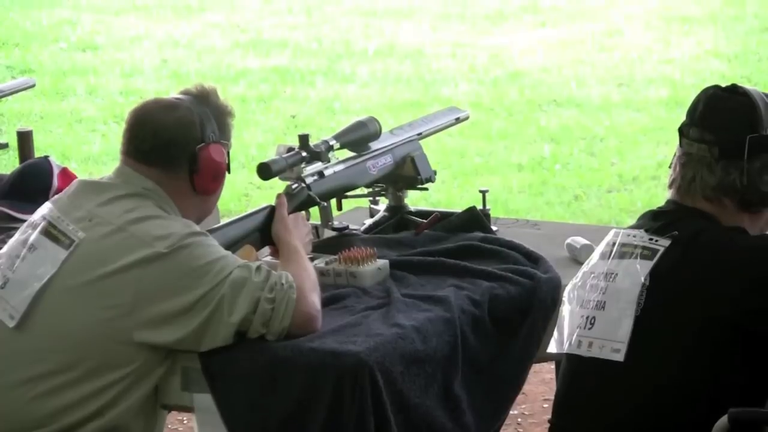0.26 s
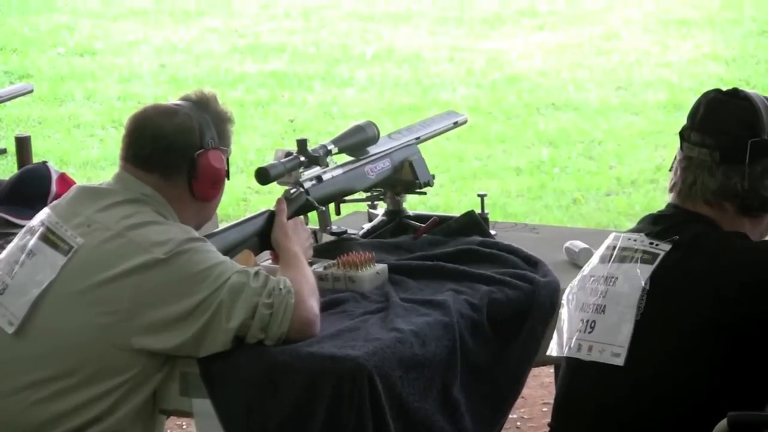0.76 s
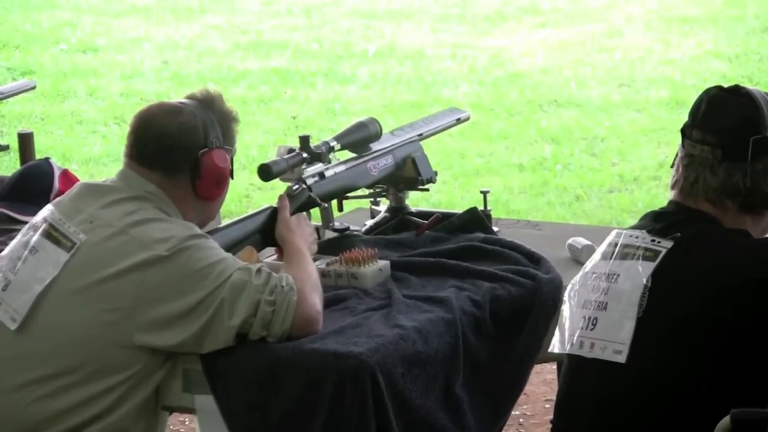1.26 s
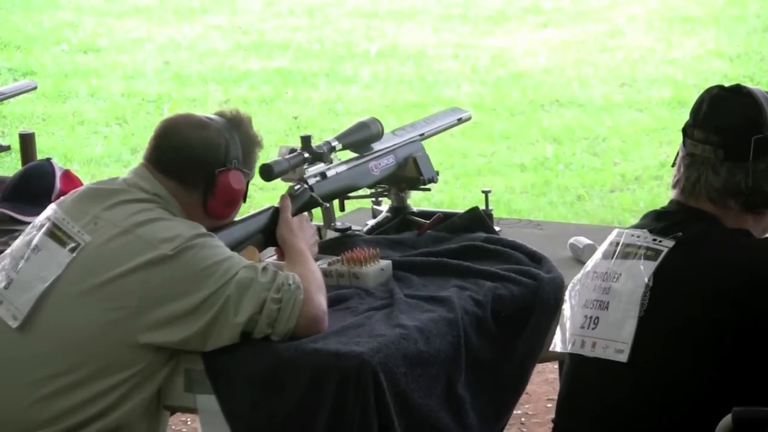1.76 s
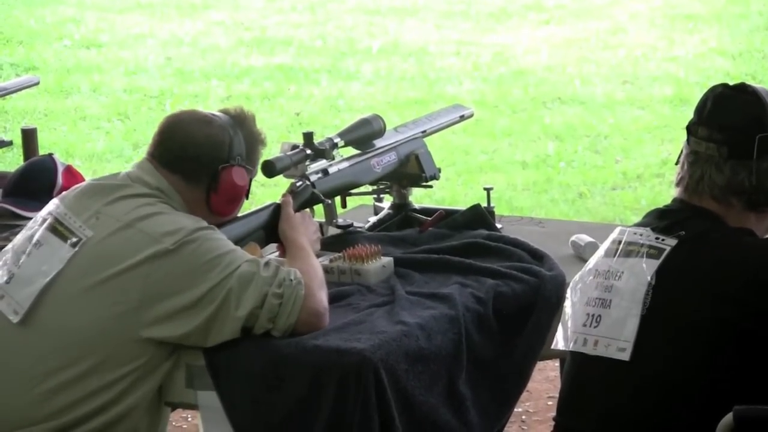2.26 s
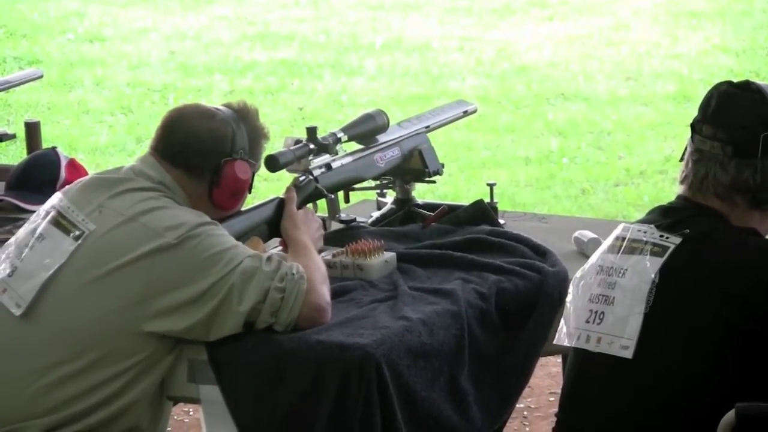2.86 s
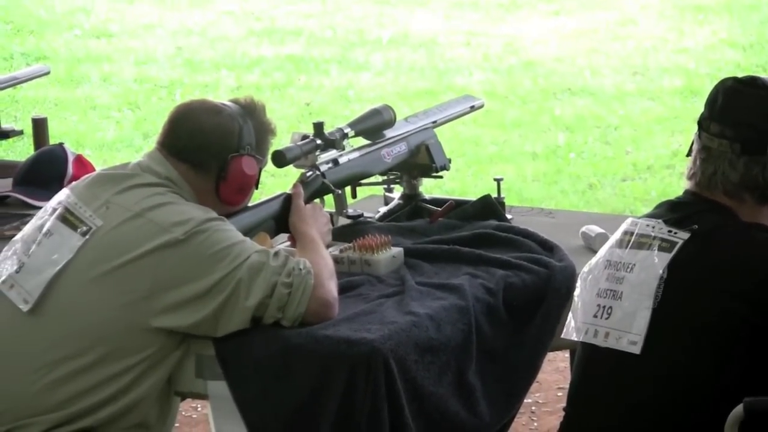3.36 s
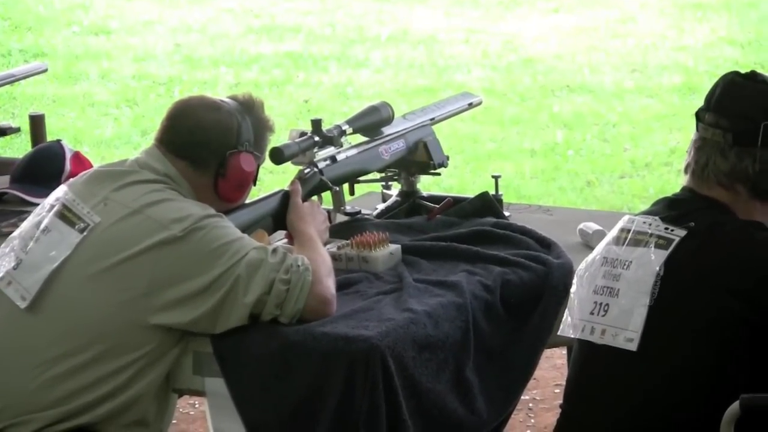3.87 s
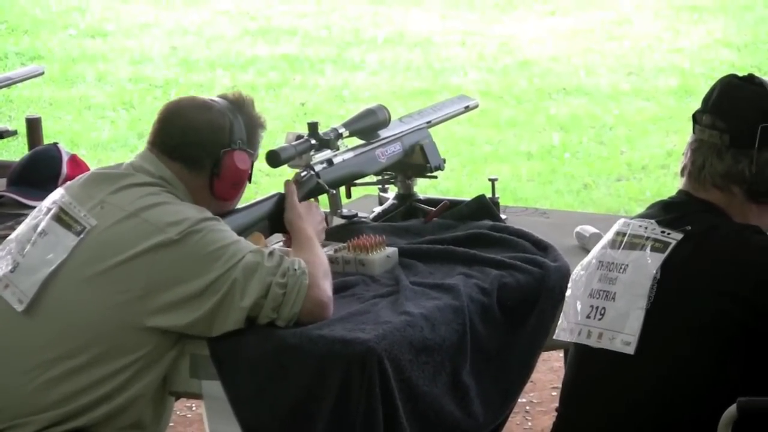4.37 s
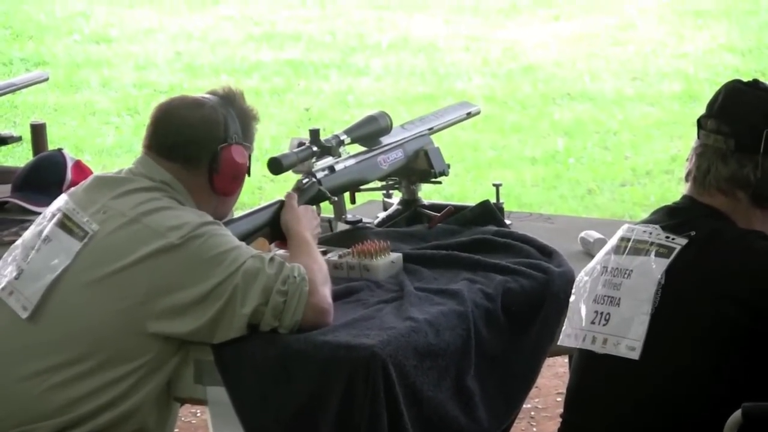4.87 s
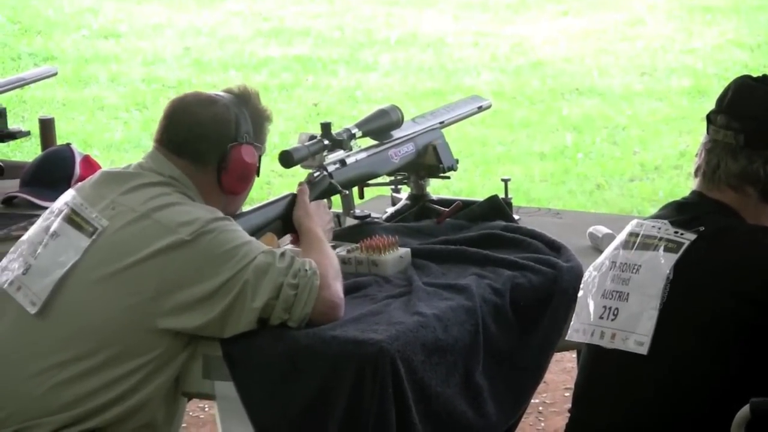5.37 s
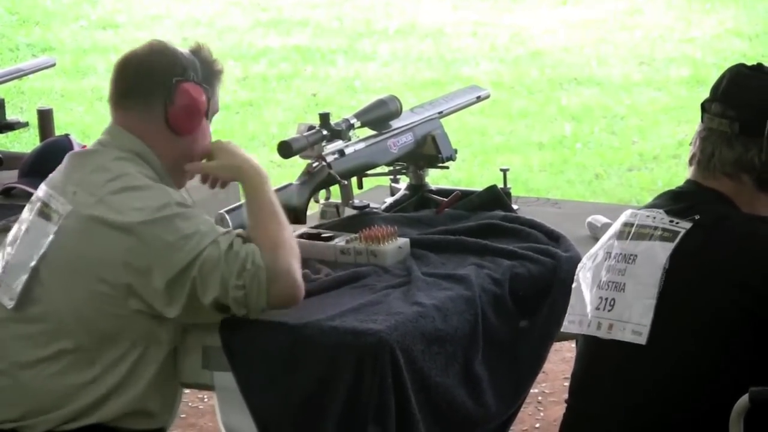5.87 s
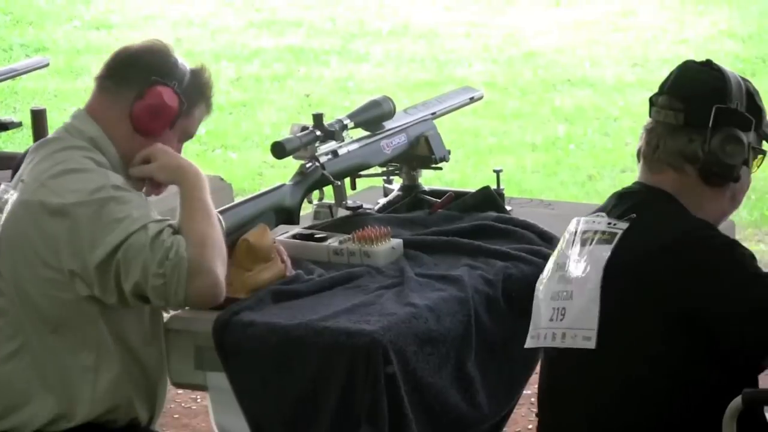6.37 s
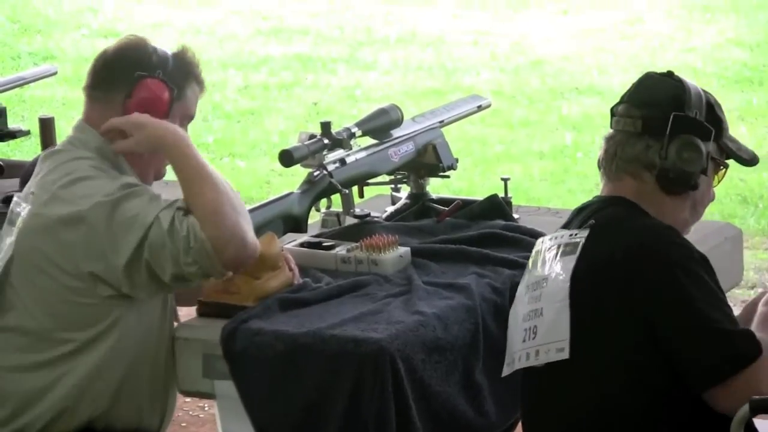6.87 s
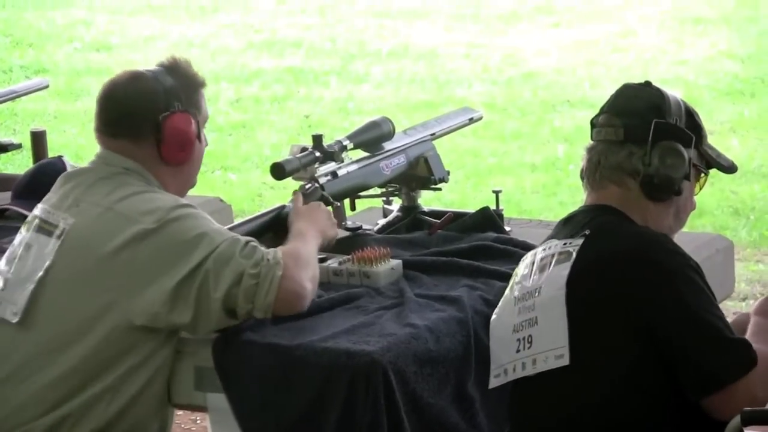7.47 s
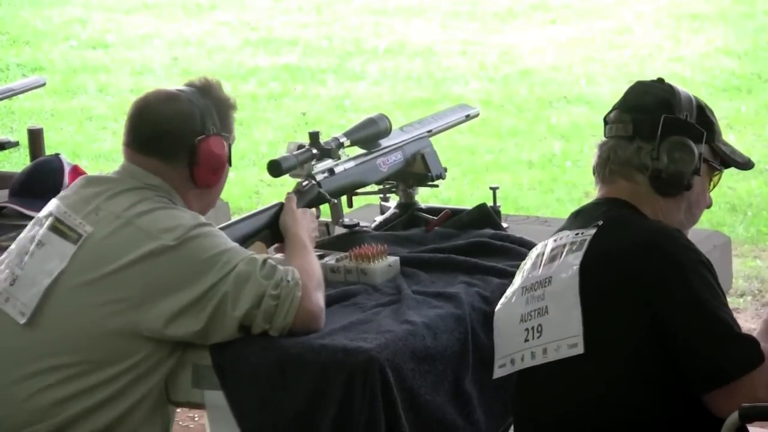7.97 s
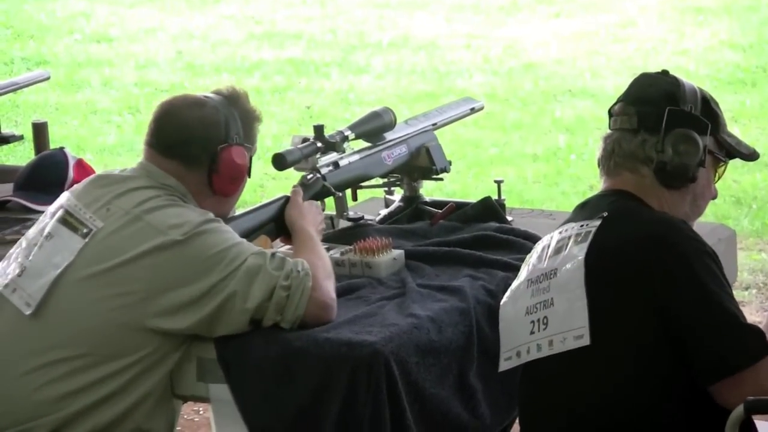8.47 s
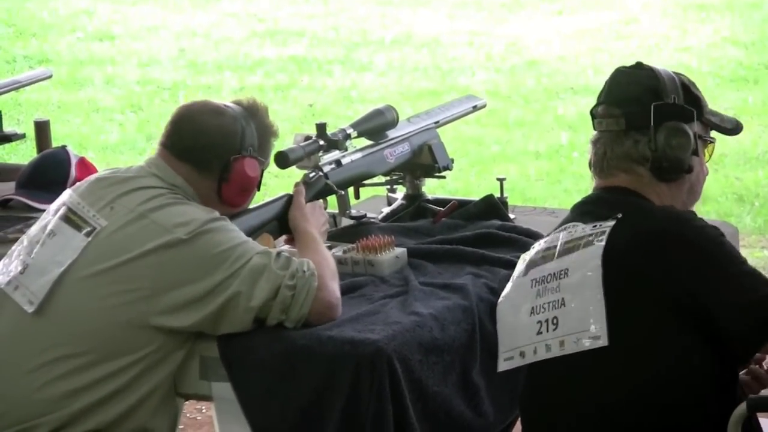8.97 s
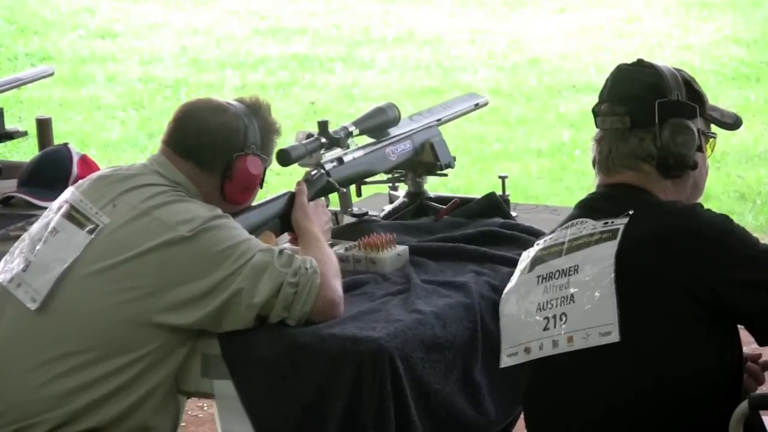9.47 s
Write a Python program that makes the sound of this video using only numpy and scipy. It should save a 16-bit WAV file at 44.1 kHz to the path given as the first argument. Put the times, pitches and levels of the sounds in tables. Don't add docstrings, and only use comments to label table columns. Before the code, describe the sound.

Small-bore or bench rifles fire from a roofed outdoor line. Each blast is a hard, distorted crack with a slap and ring under the roof, then a rolling echo from a far bank. Shots come singly, then in quick clusters midway. Steel bolt clicks and faint brassy rustles fill the gaps. The microphone's automatic gain ducks at each blast, then climbs back, lifting echoes, soft air and low hum.

```python
import sys
import numpy as np
from scipy import signal
from scipy.io import wavfile
from scipy.ndimage import uniform_filter1d, minimum_filter1d

SR = 44100
rng = np.random.default_rng(int(sys.argv[2]) if len(sys.argv) > 2 else 0)


def natural_amplitude(level_db):
    exponent = np.asarray(level_db, float) / 20
    return 10 ** exponent


def to_wav(sig):
    pcm = np.clip(np.atleast_2d(sig), -1, 1) * 32767
    pcm = np.round(pcm).astype(np.int16)
    wavfile.write(sys.argv[1], SR, pcm.T)


N = 429093
HOP = 128
BINS = np.fft.rfftfreq(4 * HOP, 1 / SR)


def evened(x):
    return x / np.sqrt(np.mean(x ** 2) + 1e-20)


def read(points, hz):
    point_hz, value = np.transpose(points)
    return np.interp(np.log(hz + 1), np.log(point_hz + 1), value)


def unit(spectrum, hz):
    gain = natural_amplitude(read(spectrum, hz))
    return gain / np.linalg.norm(gain)


def add(mix, start_s, sound):
    at = round(start_s * SR)
    sound = sound[..., max(-at, 0):]
    part = mix[..., max(at, 0):][..., :sound.shape[-1]]
    part += sound[..., :part.shape[-1]]


def resonate(x, hz, width_hz):
    pole = np.exp((2j * np.pi * hz - np.pi * width_hz) / SR)
    return 2 * signal.lfilter([1 - abs(pole)], [1, -pole], x).real


def twice(x, hz, width_hz, second_width_hz):
    return resonate(resonate(x, hz, width_hz), hz, second_width_hz)


def pan(db):
    return natural_amplitude(np.array([[db / 2], [-db / 2]]))


# pitch_hz, likeness (left-right, 1 = same)
LIKENESS = [(30, -.3), (60, .4), (130, .9), (290, .96), (640, .95), (1400, .94), (3100, .8), (6800, .45),
            (15000, .02)]
# pitch_hz, left_over_right_db
BALANCE = [(60, -2.0), (180, -2.0), (550, -2.0), (1650, -1.5), (4970, -1.5), (15000, -1.5)]


def noise(gain, patchy_db):
    a, b, c, d, patches = np.moveaxis(rng.standard_normal(gain.shape + (5,)), 2, 0)
    patches = uniform_filter1d(patches, size=8, axis=0)
    patches = evened(uniform_filter1d(patches, size=12, axis=1))
    same = np.clip(read(LIKENESS, BINS), -1, 1)
    lean = natural_amplitude(read(BALANCE, BINS) / 2)
    left = a + 1j * b
    right = same * left + np.sqrt(1 - same ** 2) * (c + 1j * d)
    z = np.array([left * lean, right / lean]) * gain * natural_amplitude(patchy_db * patches)
    return signal.istft(z.transpose(0, 2, 1), nperseg=4 * HOP, noverlap=3 * HOP)[1] / 1.5


# pitch_hz, level_db (rms)
HUM_TONES = [
    (199.6, -50.5),
    (399.2, -70),
    (598.8, -70),
]
# pitch_hz, level_db (per Hz)
AIR_SPECTRUM = [(30, -20), (100, -8), (350, -3), (600, -2), (2000, -14), (5000, -23), (14000, -33),
                (16000, -40)]


def background():
    t = np.arange(N) / SR
    waver = natural_amplitude(1.5 * evened(resonate(rng.standard_normal(N), 3, 6)))
    hum = np.zeros(N)
    for hz, db in HUM_TONES:
        hum += np.sqrt(2) * natural_amplitude(db) * np.sin(2 * np.pi * (hz * t + rng.random()))
    frames = N // HOP + 10
    air = noise(np.tile(unit(AIR_SPECTRUM, BINS), (frames, 1)), patchy_db=1.5)[:, :N]
    return waver * hum * pan(-1.5) + natural_amplitude(-44) * air


# start_s, level_db, pitch_hz, t60_s
KNOCKS = [
    (9.6, -33, 220, .3),
    (.95, -44, 260, .2),
]


def bench_knocks():
    out = np.zeros((2, N))
    t = np.arange(SR // 2) / SR
    for start_s, db, hz, t60_s in KNOCKS:
        wood = evened(twice(rng.standard_normal(len(t)), hz, 250, 400))
        add(out, start_s, natural_amplitude(db - 60 * t / t60_s) * wood)
    return out


# start_s, end_s, pitch_hz, width_hz, level_db
BOLT_SQUEALS = [
    (2.28, 2.4, 7000, 150, -48),
    (8.27, 8.47, 7500, 120, -49),
    (8.26, 8.5, 13200, 60, -62),
    (8.49, 8.67, 13250, 90, -50),
    (3.3, 3.42, 13100, 80, -66),
]
# start_s, end_s, pitch_hz, width_hz, level_db
BRASS_RUSTLES = [
    (2.39, 2.51, 10000, 6000, -47),
    (7.925, 8.06, 11800, 3000, -59),
    (8.3, 8.5, 9000, 5000, -58),
    (8.5, 8.66, 7000, 7000, -43),
    (3.55, 4.14, 11000, 5000, -62),
]


def rubbing():
    out = np.zeros((2, N))
    for start_s, end_s, hz, width_hz, db in BOLT_SQUEALS + BRASS_RUSTLES:
        rub = rng.standard_normal((2, SR))[:, :round((end_s - start_s) * SR)]
        swell = signal.windows.tukey(rub.shape[1], .3)
        add(out, start_s, natural_amplitude(db) * evened(twice(rub, hz, width_hz, width_hz * 2)) * swell)
    return out


def tick(db, hz, top_db):
    t60_s = .014
    t = np.arange(SR // 10) / SR
    burst = rng.standard_normal((2, len(t))) * natural_amplitude(-60 * t / t60_s)
    crack = twice(burst, 6000, 3500, 3500)
    ring = 3.0 * twice(burst, hz, 700, 700)
    body = 2.6 * resonate(burst[0], 2000, 1800)
    dull = signal.butter(4, 7400, fs=SR, output="sos")
    top = natural_amplitude(min(top_db, -12) + .3) * twice(burst, 12000, 4000, 4000)
    return natural_amplitude(db + 1.6) * pan(-1.5) * (signal.sosfilt(dull, crack + ring + body) + top)


# start_s, level_db (peak after gain control), pitch_hz, top_db
CLICKS = [(0.0992, -36, 4350, -12), (0.831, -18, 4530, -32), (0.8565, -24, 5220, -33),
          (1.0794, -31, 4170, -22), (1.7504, -22, 4760, -24), (2.0333, -26, 4350, -37),
          (2.0827, -31, 4520, -33), (2.3945, -21, 5020, -15), (3.0505, -17, 4190, -20),
          (3.1363, -23, 4310, -30), (3.2869, -21, 4320, -40), (3.3288, -21, 5130, -41),
          (3.6032, -29, 4210, -34), (3.6461, -30, 4010, -36), (3.7125, -34, 4050, -31),
          (3.7509, -32, 4490, -31), (3.8641, -34, 4120, -25), (5.3492, -19, 5490, -25),
          (5.4445, -22, 5540, -30), (6.2257, -22, 5030, -25), (6.3425, -23, 4540, -32),
          (7.4205, -25, 5290, -25), (7.6395, -32, 4200, -32), (7.9274, -35, 4260, -18),
          (8.5036, -28, 8370, -18), (9.1835, -8, 4430, -33), (9.2609, -20, 4210, -31),
          (9.3242, -24, 4770, -30), (9.6879, -29, 4010, -40)]


def bolts_and_cases():
    out = np.zeros((2, N))
    for start_s, *click in CLICKS:
        add(out, start_s, tick(*click))
    return out


def muzzle(count):
    t = np.arange(count) / SR
    taps = rng.standard_normal((2, count)) * (rng.random(count) < .012) * natural_amplitude(-500 * t)
    taps[:, 0] = 1
    u = t / .0002
    return natural_amplitude(8.0) * signal.fftconvolve(taps, ((1 - u) * np.exp(-u))[None])


def ground_thud(count, lead_s):
    t = np.arange(count) / SR
    ahead = t[t < lead_s]
    thud = evened(resonate(rng.standard_normal(count), 1100, 1200))[:len(ahead)]
    return natural_amplitude(-51) * thud * ahead / lead_s


# pitch_hz, level_db (per Hz)
ROOF_SPECTRUM = [(25, -32), (114, -21), (200, -4), (280, -1), (363, -.5), (620, -6), (1020, -8), (1840, -9),
                 (2480, -12), (4030, -19), (6380, -21), (14400, -31), (16000, -40)]
# pitch_hz, t60_s
ROOF_DECAY = [(60, .9), (250, .85), (700, .78), (2000, .8), (6000, .7), (14000, .55)]


def roof_ring(age_s, ring_db):
    ring = unit(ROOF_SPECTRUM, BINS) * natural_amplitude(-60 * age_s / read(ROOF_DECAY, BINS))
    slap = natural_amplitude(-60 * age_s / .15)
    return ring * (natural_amplitude(ring_db) + (1 - natural_amplitude(ring_db)) * slap)


# pitch_hz, level_db (per Hz)
FAR_SPECTRUM = [(25, -41), (64, -17), (166, -9), (293, -17), (489, -8), (659, -6), (863, -2), (1370, -3),
                (1740, -2), (2220, -4), (3160, -6), (5570, -15), (11300, -33), (16000, -60)]
# pitch_hz, loss_db_per_s
FAR_FADING = [(40, 12), (100, 12), (200, 20), (400, 21), (800, 5), (1500, .1), (3000, 1), (6000, 8),
              (12000, 28)]
# age_s (since the blast), level_db
ECHO_ROLL = [(0, -26), (.1, -17.5), (.3, -18.5), (.55, -23.5), (.7, -32), (1.0, -42.5), (1.3, -51),
             (1.8, -66), (2.6, -88)]


def far_echo(age_s, far_db):
    roll_db = np.interp(age_s, *np.transpose(ECHO_ROLL))
    return unit(FAR_SPECTRUM, BINS) * natural_amplitude(far_db + roll_db - (age_s - .5) * read(FAR_FADING, BINS))


def shot(db, bright_db, far_db, ring_db, count, lead_s):
    age_s = np.arange(count)[:, None] * HOP / SR
    bright = natural_amplitude(bright_db * np.log2(BINS / 1500 + .05))
    tails = noise(np.hypot(roof_ring(age_s, ring_db), far_echo(age_s, far_db)) * bright, patchy_db=1.3)
    t = np.arange(tails.shape[1]) / SR
    drum = evened(twice(rng.standard_normal(tails.shape), 75, 22, 22))
    tails = tails + drum * natural_amplitude(-33 + np.interp(t, *np.transpose(ECHO_ROLL)))
    tails = tails * (1 - np.exp(-t / .001))
    add(tails, 0, muzzle(1200))
    thud = ground_thud(1200, lead_s)
    return natural_amplitude(db) * np.hstack([[thud, thud], tails])


# start_s, level_db, bright_db (per octave), far_db (far echo share), ring_db (roof ring share)
RIFLE_SHOTS = [(-1.2, 29.5, .1, .1, -3), (.141, 28.5, .3, -1.5, -2), (1.2165, 29, -.1, -2.5, -6),
               (2.519, 29, -.1, -2, -6), (4.149, 28, .4, .1, -1), (4.29, 26.5, .3, .1, -.5),
               (4.428, 30, .6, .1, -.5), (4.822, 24.5, -.5, -2.5, -4), (5.688, 28, .1, -4, -3),
               (6.398, 27, .4, -3, -3), (6.49, 25, .9, -4, -2), (6.870, 33.4, .3, -5, -.8),
               (8.6735, 30, -.2, -2.2, -7)]


def gunfire(line):
    lead_s = .005
    next_s = [row[0] for row in RIFLE_SHOTS[1:]] + [N / SR]
    for (start_s, *blast), end_s in zip(RIFLE_SHOTS, next_s):
        count = int((end_s - start_s + .35) * SR / HOP)
        add(line, start_s - lead_s, shot(*blast, count=count, lead_s=lead_s))


def ducking(x):
    meter_s, hold_s, climb_db_per_s = .04, .25, 31
    aim_db, most_gain_db, opening_db = -5, 8.5, -6
    keep = np.exp(-1 / (meter_s * SR))
    meter_db = 10 * np.log10(signal.lfilter([1 - keep], [1, -keep], (x ** 2).mean(0)) + 1e-12)
    half = round(hold_s * SR / 2)
    waiting = -minimum_filter1d(-np.r_[np.full(half, -99.), meter_db], size=2 * half + 1)[:N]
    fall = np.arange(N) * climb_db_per_s / SR
    held_db = np.maximum(np.maximum.accumulate(waiting + fall), opening_db) - fall
    return np.maximum(held_db - aim_db, -most_gain_db)


def ceiling():
    open_db, gripped_db = -2.6, -6.8
    wake_s, grip_per_s, latest_grip_s = .33, .021, .026
    t = np.arange(N) / SR
    times = np.array([row[0] for row in RIFLE_SHOTS])
    delays = np.minimum(grip_per_s * (np.diff(times) - wake_s), latest_grip_s)
    loose = np.zeros(N)
    for start_s, delay_s in zip(times[1:], delays):
        if delay_s > 0:
            loose += (t > start_s - .005) & (t < start_s + delay_s)
    return natural_amplitude(gripped_db + (open_db - gripped_db) * uniform_filter1d(loose, size=200))


def scene():
    line = background()
    gunfire(line)
    handling = bench_knocks() + rubbing() + bolts_and_cases()
    return line + handling * natural_amplitude(ducking(line))


def band_limit(x):
    return signal.sosfilt(signal.butter(12, 16430, fs=SR, output="sos"), x)


def record(dry):
    cut = signal.sosfilt(signal.butter(2, 85, "high", fs=SR, output="sos"), dry)
    top = ceiling()
    driven = cut / natural_amplitude(ducking(dry)) / top
    clipped = top * driven / (1 + abs(driven) ** 4.0) ** (1 / 4.0) * pan(-.5)
    clipped = signal.sosfilt(signal.butter(1, 45, "high", fs=SR, output="sos"), clipped)
    edge = signal.firwin(255, 15900, window=("kaiser", 9), fs=SR)
    mix = signal.oaconvolve(clipped, edge[None], "same")
    return band_limit(mix)


dry = scene()
out = record(dry)
to_wav(out)
```